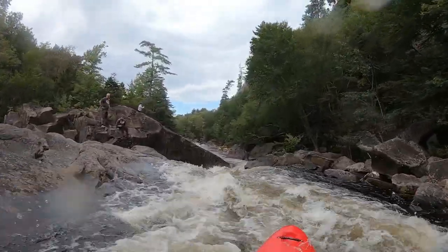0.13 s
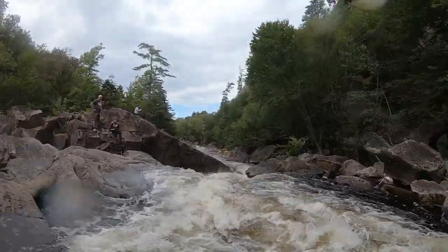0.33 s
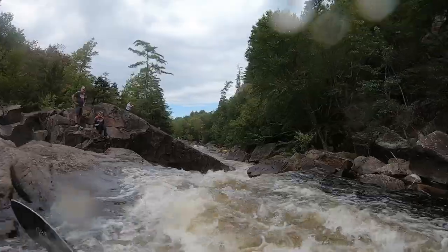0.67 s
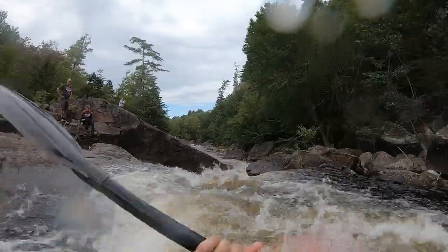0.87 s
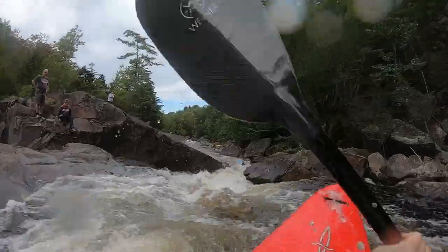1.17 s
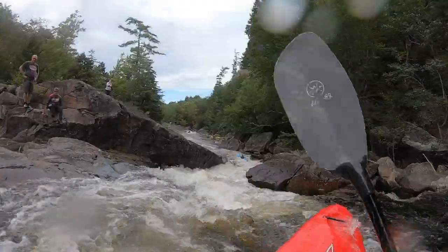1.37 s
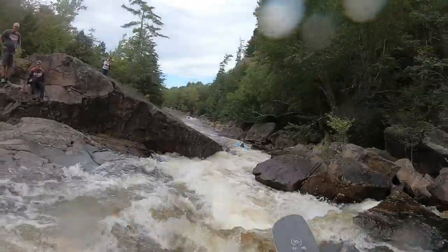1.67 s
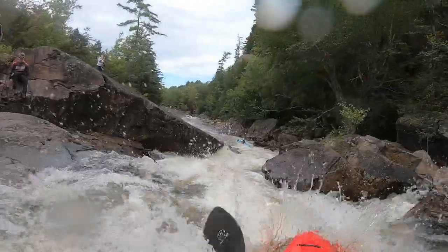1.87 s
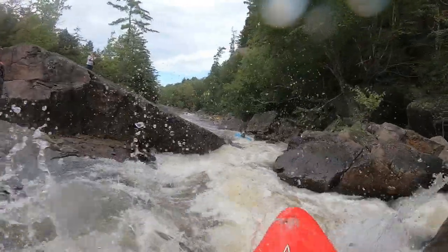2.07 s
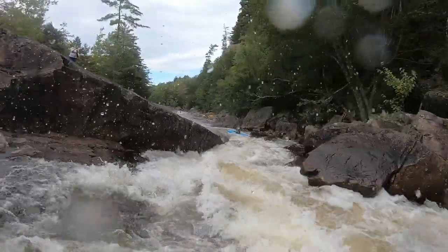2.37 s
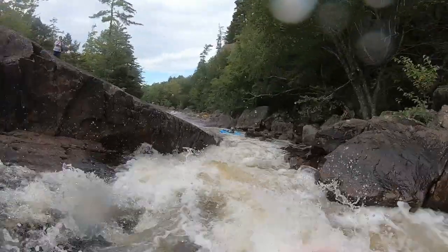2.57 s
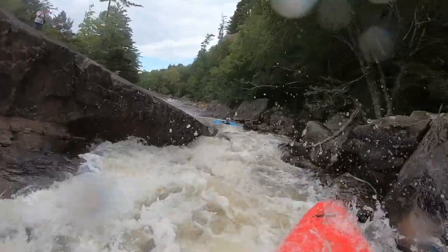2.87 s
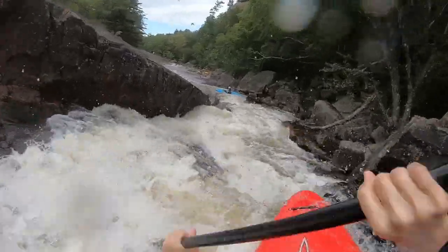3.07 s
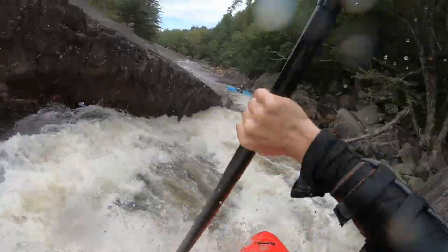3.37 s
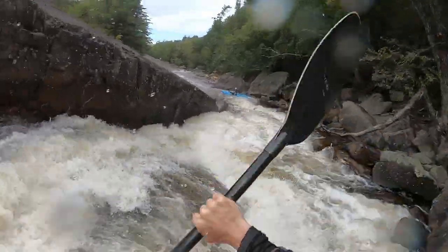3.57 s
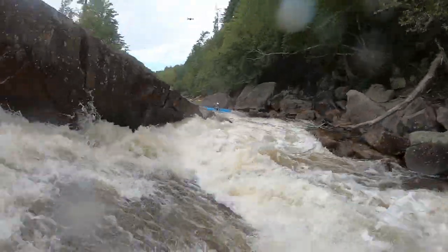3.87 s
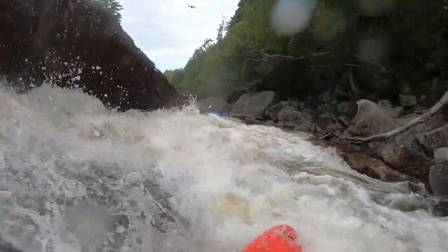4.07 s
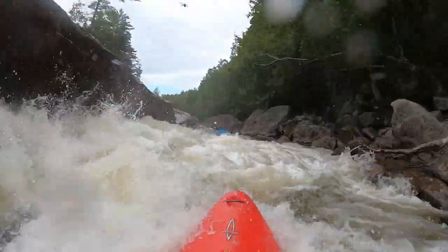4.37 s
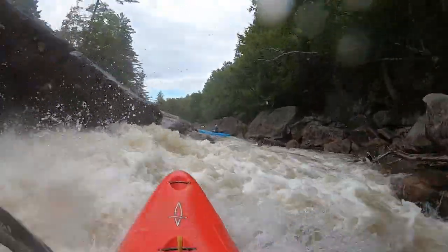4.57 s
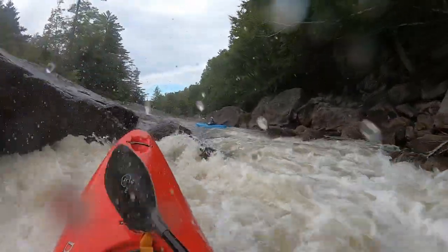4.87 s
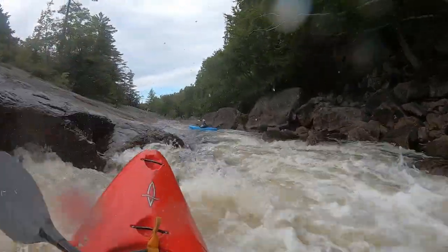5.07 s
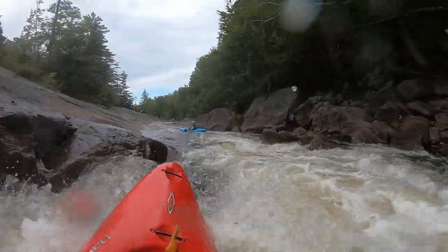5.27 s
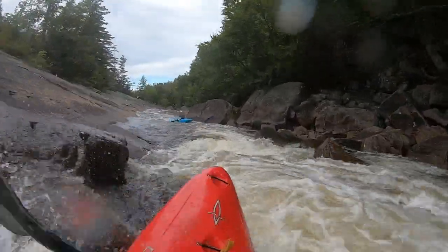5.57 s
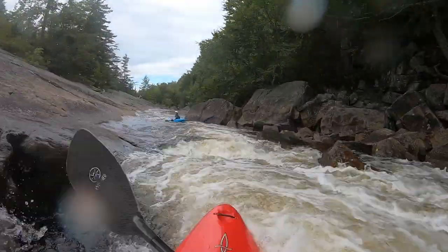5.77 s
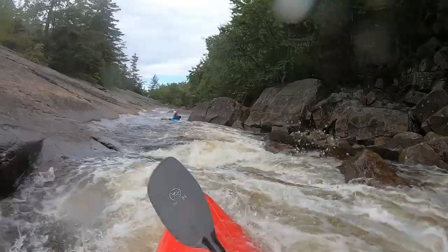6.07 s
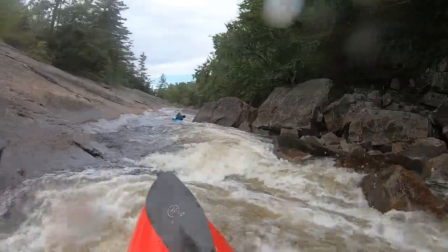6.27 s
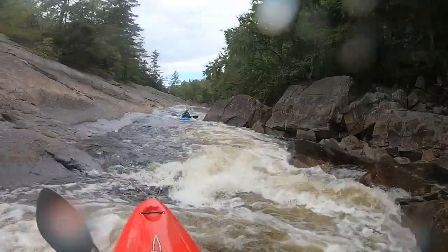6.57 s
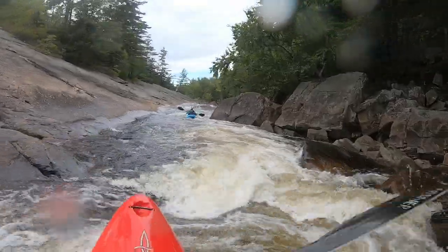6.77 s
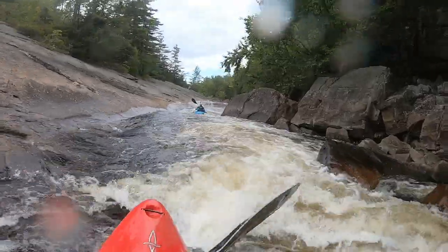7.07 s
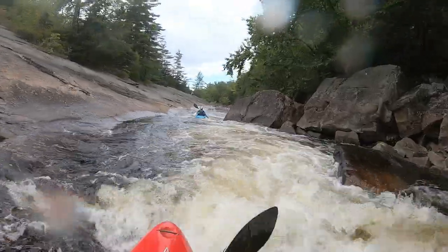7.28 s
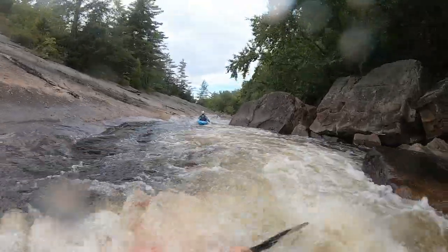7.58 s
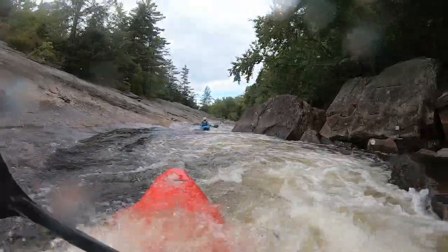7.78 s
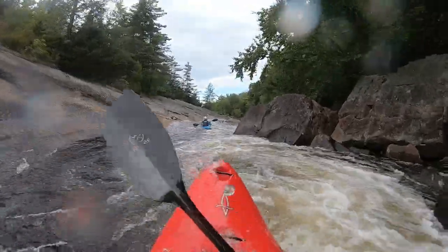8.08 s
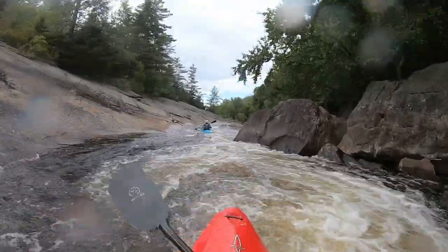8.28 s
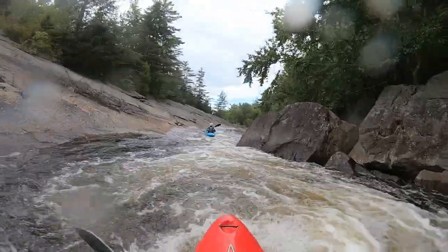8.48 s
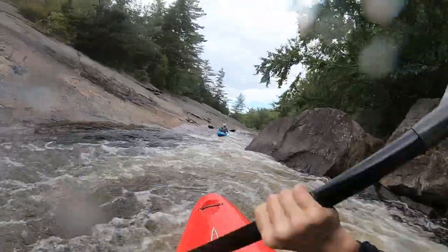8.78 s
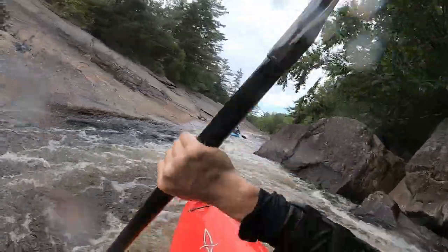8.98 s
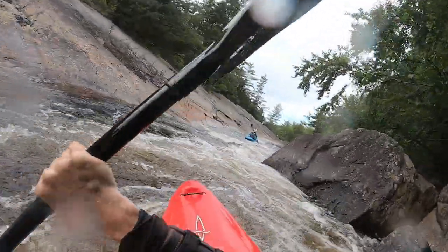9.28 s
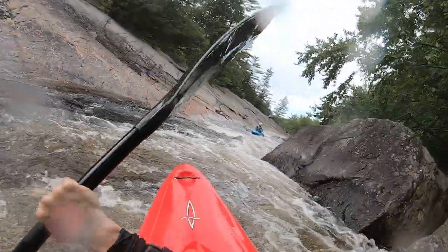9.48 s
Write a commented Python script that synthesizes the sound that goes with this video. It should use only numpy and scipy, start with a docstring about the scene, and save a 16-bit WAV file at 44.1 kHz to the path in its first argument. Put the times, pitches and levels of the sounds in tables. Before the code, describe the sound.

Close rushing river heard from a kayak's wet camera: muffled churning, heavy low knocks and surges, then a clearer, calmer rush with bubbling gurgles.

```python
"""A rocky whitewater rapid, run in a kayak, heard close by two microphones in a small camera's wet housing.
The river is hiss, ringing bubbles and pattering droplets, coloured by the housing and swelling with splashes.
Air and surges of water buffet the microphones as deep noise and slow swings; slaps thump in falling pitch.
Drops tick on the ringing case, spray spatters close by as bright noise, and clusters of bubbles gurgle.
A film of water muffles the microphone port until it bursts almost halfway down."""
import sys
import numpy as np
from scipy import signal
from scipy.fft import rfft, irfft
from scipy.io import wavfile
from scipy.ndimage import uniform_filter1d

SR = 44100
rng = np.random.default_rng(int(sys.argv[2]) if len(sys.argv) > 2 else 0)


def to_wav(s):
    """Save 16-bit WAV."""
    ch = np.atleast_2d(s).T  # columns
    pcm = np.round(np.clip(ch, -1, 1) * 32767)  # PCM
    wavfile.write(sys.argv[1], SR, pcm.astype(np.int16))


N = 424683
TIME = np.arange(N) / SR
CUTOFF_HZ = 15200

# how alike the two microphones hear:
# (frequency [Hz], share of power in common [0-1], lead of the left [rad])
MICROPHONE_PAIR = [(300, 1, -3), (491, 0.95, 1.12), (670, 0.7, -1.5), (820, 0.47, -3.5), (1030, 1, -4.5),
                   (1250, 0.88, -4), (1456, 0.68, -4.5), (1776, 0.86, -1.12), (2116, 0.24, 3.5),
                   (2270, 0.54, 2), (2560, 1, 2), (3100, 0.63, 5), (3550, 0.37, 5.5), (4200, 0.94, 3.5),
                   (5420, 0.14, 5), (6170, 0.68, 1.5), (7300.0, 0.17, 2.5), (8330, 0.6, 5),
                   (10140, 0.37, 6), (11600, 0, 27.5)]


def from_db(db):
    """Decibels to gain."""
    return 10 ** (np.asarray(db) / 20)


def to_db(gain):
    """Gain to decibels."""
    return 20 * np.log10(gain)


def rms_one(x):
    """Scale to an rms of 1."""
    return x / np.sqrt(np.mean(x ** 2) + 1e-20)


def in_time(rows, t):
    """The columns of a curve at the times t."""
    times, *columns = np.transpose(rows)
    return [np.interp(t, times, column) for column in columns]


def at_hz(rows, hz):
    """The columns of a spectrum at the frequencies hz, joined along a logarithmic axis."""
    points, *columns = np.transpose(rows)
    return [np.interp(np.log(hz + 1), np.log(points), column) for column in columns]


def drift(rate_hz):
    """Slow chance with a spread of 1: noise through two equal low-pass poles at rate_hz."""
    step = 40  # samples between drawn points
    pole = np.exp(-2 * np.pi * rate_hz * step / SR)
    noise = rng.standard_normal(N // step + 2002)
    slow = signal.lfilter([1], [1, -2 * pole, pole * pole], noise)[2000:]
    return np.interp(np.arange(N) / step, np.arange(len(slow)), rms_one(slow))


def ring(clicks, hz, t60):
    """A unit click sets a sine of height 1 ringing, down 60 dB after t60 seconds."""
    decay = np.exp(-np.log(1000) / (t60 * SR))
    angle = 2 * np.pi * hz / SR
    return signal.lfilter([0, np.sin(angle)], [1, -2 * decay * np.cos(angle), decay * decay], clicks + 1e-18)


def grains(per_s, spread_db):
    """Random clicks of either sign, many small and a few large."""
    sizes = from_db(spread_db * np.minimum(rng.exponential(1, N), 6))
    return (rng.random(N) < per_s / SR) * sizes * rng.choice([-1, 1], N)


def lumps(colour, lump_s=0.065):
    """Coloured noise of rms near 1, evened out so that no lump stands far above the next."""
    noise = rms_one(irfft(rfft(rng.standard_normal(N)) * colour, N))
    size = int(lump_s * SR)
    power = uniform_filter1d(uniform_filter1d(noise ** 2, size), size)
    return noise / np.sqrt(power + 0.015)


def foam(cycles=12.5, bubble_db=-11.02, droplet_db=-11.0, surge_db=0.87):
    """Countless far bubbles merge into hiss; near ones ring in clumps, and droplets patter."""
    births = grains(2600 * from_db(3 * drift(7)), spread_db=3.5)
    pitches = np.geomspace(250, 4500, 24)
    dealt = rng.integers(0, len(pitches), N)
    # each bubble falls 60 dB in the same number of cycles
    bubbles = sum(hz * ring(births * (dealt == k), hz, cycles / hz) for k, hz in enumerate(pitches))
    droplets = grains(700 * from_db(4 * drift(5)), spread_db=4.0)
    hiss = rng.standard_normal(N)
    mix = hiss + from_db(bubble_db) * rms_one(bubbles) + from_db(droplet_db) * rms_one(droplets)
    return mix * from_db(surge_db * drift(16.0))


def water_levels(t, trim_db=-0.6, swell_db=0.18, swell_hz=8, splash_fall_s=0.13):
    """Churn, roar and spray in dB: the swelling rapid, plus splashes that build to a crest and fall away."""
    # the steady rapid as the boat moves through it, before the trim:
    # (time [s], low churn [dB], mid roar [dB], high spray [dB])
    rapid = [(0.0, -39, -37.5, -56.5), (1.04, -38.5, -39, -57), (1.55, -41, -40.5, -58.5),
             (2.2, -37, -40.5, -58.5), (2.68, -42, -42, -59), (3.72, -34.5, -39, -56),
             (4.48, -42, -45.5, -61), (5.23, -41, -42.5, -58), (6.97, -41.5, -41.5, -58.5),
             (7.8, -35.5, -35.5, -52.5), (8.13, -40, -39, -57), (9.63, -46, -44.5, -62.5)]
    # waves and paddle strokes splashing beside the boat:
    # (crest time [s], build-up time constant [s], churn [dB], roar [dB], spray [dB])
    splashes = [(0.8, 0.16, -47, -43, -57.5), (1.11, 0.19, -41, -37.5, -55.5),
                (1.33, 0.11, -45, -39.5, -76), (1.72, .05, -50, -54, -56.5), (1.99, 0.1, -33.5, -61, -76),
                (2.26, 0.13, -32, -40, -55), (3.19, 0.044, -41, -52, -66), (3.8, 0.092, -39, -35.5, -55.5),
                (5.3, 0.17, -41, -46.5, -60.5), (5.72, 0.057, -39.5, -44.5, -72),
                (5.98, 0.087, -62, -44.5, -59), (6.72, 0.066, -38.5, -46, -66),
                (7.05, 0.089, -44, -46, -60), (7.38, 0.22, -41, -51, -56), (7.79, 0.084, -55, -39.5, -56),
                (7.95, 0.084, -32.5, -38, -61.5), (8.61, 0.23, -46, -44, -59.5),
                (9.17, 0.12, -40, -44, -60.5)]
    swell = swell_db * np.interp(t, TIME, drift(swell_hz))
    power = from_db(np.array(in_time(rapid, t)) + trim_db + swell) ** 2
    for crest_s, build_s, *zones_db in splashes:
        envelope = np.exp(-np.maximum((crest_s - t) / build_s, (t - crest_s) / splash_fall_s))
        power = power + np.outer(from_db(zones_db), envelope) ** 2
    return to_db(np.sqrt(power))


def humps(modes, hz):
    """Left and right gain in dB of broad resonances, on a grid of frequency by time."""
    total = 0
    for centre, width, left_db, right_db in modes:
        shape = np.exp(-(2 * (hz - centre) / width) ** 2)
        total = total + np.multiply.outer([left_db, right_db], shape)
    return total


def river(churn_hz=368.0, roar_hz=1250.0, spray_hz=5250.0, lowest_hz=100.0, bright_hz=7100.0,
          bright_gain=0.58, alike_below_hz=373.0):
    """Foam heard through the housing and the wet port; churn, roar and spray swell with each wave."""
    # colour of rushing water: (frequency [Hz], relative level [dB])
    water_colour = [(120, 0.5), (260, -11), (400, -8), (600, -13.5), (1100, -13), (2000, -19),
                    (3000, -18.5), (3700, -32.5), (7300, -39), (10000, -38.5), (11500, -46), (13500, -50.5),
                    (15000, -66)]
    # resonances of the housing: (frequency [Hz], width [Hz], left [dB], right [dB])
    housing = [(178.4, 58, 9, 10), (326, 114, 8, 6), (499.6, 56, 8.5, 3), (733, 117, 7, 8.5),
               (1010, 270, 6, 8.5), (1325, 322, 13.5, 15), (1749, 420, 14.5, 11), (2310, 127, 3, -5),
               (3270, 450, 4, 2.5), (4157, 214, 10, 6.5), (4780, 850, 4.5, 1), (5887, 930, 11, 11),
               (6830, 850, 10, -1), (7970, 1000, 2.5, 6), (9730, 2200, 2.5, 2)]
    # resonances of the port when clear of water: (frequency [Hz], width [Hz], left [dB], right [dB])
    open_port = [(2324, 340, 12.5, 8.5), (2679, 530, 14.5, 8.5), (5970, 380, 7, 3), (9700, 1000, 3, 0)]
    # the film weighs the port down and damps it: (time [s], openness [0-1], tuning [ratio])
    film = [(0, 0.13, 0.94), (3.5, 0.08, 1), (4.05, 0.1, 0.61), (4.2, 0.1, 0.67), (4.35, 0.2, 0.51),
            (4.39, 0.6, 0.87), (4.44, 0.93, 0.96), (5.1, 1, 0.96), (9.63, 1, 0.98)]
    # where churn, roar and spray lie: (low edge [Hz], high edge [Hz])
    zones = [(130, 700), (900, 1900), (4000, 12000)]

    frame = 1024  # samples
    hz, t, (shared, *own) = signal.stft([foam(), foam(), foam()], SR, nperseg=frame)
    grid = hz[:, None]

    # long waves reach both microphones alike
    alike, lead = at_hz(MICROPHONE_PAIR, grid)
    alike = np.where(grid < alike_below_hz, 1, np.clip(alike, 0, 1))
    lead = lead * (grid > alike_below_hz)
    sound = np.sqrt(alike) * shared + np.sqrt(1 - alike) * np.array(own)
    sound[0] *= np.exp(1j * lead)

    openness, tuning = in_time(film, t)
    levels_db = water_levels(t)
    colour_db = at_hz(water_colour, grid)[0] + humps(housing, grid)
    colour_db = colour_db + openness * humps(open_port, grid / tuning)
    # the louder the spray, the brighter its top
    louder_db = levels_db[2] - levels_db[2].mean()
    colour_db = colour_db + bright_gain * louder_db * np.clip(np.log2((grid + 1) / bright_hz), 0, 1)
    sound *= from_db(colour_db) * np.minimum(grid / lowest_hz, 1) ** 2

    # each zone of the spectrum follows its own level, blending into the next
    power = np.mean(np.abs(sound.mean(axis=0)) ** 2, axis=1) * 4 / 3  # 4/3 for the Hann window
    shares = at_hz(np.c_[[churn_hz, roar_hz, spray_hz], np.eye(len(zones))], grid)
    for (low, high), share, level_db in zip(zones, shares, levels_db):
        zone_rms = np.sqrt(power[(hz >= low) & (hz < high)].sum())
        sound *= (from_db(level_db) / zone_rms) ** share
    return signal.istft(sound, SR, nperseg=frame)[1][:, :N]


def air_level(trim_db=2.5, unrest_db=1.5, unrest_hz=8.9, attack_s=0.0166, release_s=0.0185):
    """Pressure on the microphone in dB: restless airflow, plus gusts that rise, hold and let go."""
    # steady push of the air on the microphone, before the trim: (time [s], level [dB])
    airflow = [(0.0, -39), (0.62, -35), (1.6, -34), (2.15, -28.5), (2.68, -37), (3.0, -29), (3.7, -27),
               (4.2, -28.5), (4.33, -36.5), (4.72, -35.5), (5.71, -34.5), (6.25, -42.5), (8.07, -33),
               (8.39, -38), (9.09, -40), (9.63, -41.5)]
    # gusts as the boat lurches: (time of full strength [s], hold [s], level [dB])
    gusts = [(0.277, 0.063, -30.5), (0.846, 0.12, -29), (1.115, 0.15, -25.5), (1.966, 0.08, -26.5),
             (2.198, 0.078, -28.5), (2.986, 0.047, -21), (3.132, 0.095, -23), (3.763, 0.051, -18),
             (4.094, 0.069, -21.5), (4.536, 0.05, -29.5), (4.761, 0.029, -27.5), (4.953, 0.057, -27),
             (5.116, 0.065, -31), (5.433, 0.39, -32), (6.085, 0.11, -29.5), (6.77, 0.44, -31.5),
             (7.525, 0.16, -31.5), (7.916, 0.24, -30.5), (9.133, 0.13, -32.5)]
    steady_db = in_time(airflow, TIME)[0] + trim_db
    power = from_db(steady_db + unrest_db * drift(unrest_hz)) ** 2
    for start_s, hold_s, db in gusts:
        end_s = start_s + hold_s
        corners = [start_s - attack_s, start_s, end_s, end_s + release_s]
        envelope = np.interp(TIME, corners, [0, 1, 1, 0])
        power = power + (from_db(db) * envelope) ** 2
    return to_db(np.sqrt(power))


def buffeting(hard_edge_hz=87.6, hard_from_db=-32.0, hard_range_db=11.5):
    """Lumps of pressure on the microphone: gentle gusts are deep and slow, hard ones flutter faster."""
    # colour of the gentle buffeting: (frequency [Hz], relative level [dB])
    buffet_colour = [(5, -43), (15, 9.5), (27, -3.5), (50, -4.5), (70, -7), (100, -17.5), (130, -20),
                     (200, -50), (300, -130)]
    hz = np.arange(N // 2 + 1) * SR / N
    gust_db = air_level()
    gentle = lumps(from_db(at_hz(buffet_colour, hz)[0]))
    hard = lumps(np.minimum(hz / 20, 1) / (1 + (hz / hard_edge_hz) ** 12))
    share = np.clip((gust_db - hard_from_db) / hard_range_db, 0, 1)
    return (np.sqrt(1 - share) * gentle + np.sqrt(share) * hard) * from_db(gust_db)


def slaps(glide_s=0.0055, rise_s=0.0038, rise_share=0.33, splash_db=-12.5, splash_hz=780.0,
          splash_s=0.0047):
    """Water piles on the port, so its ring falls in pitch, with a short dull splash; short slaps hit sharply."""
    # slaps and plops on the microphone, level before the rise and decay:
    # (time [s], level [dB], start pitch [Hz], end pitch [Hz], decay [s])
    slap_list = [(0.766, -31, 523, 443, 0.008), (1.083, -33, 260, 160, 0.0077),
                 (1.717, -25, 730, 440, 0.013), (1.723, -29, 220, 110, 0.0069),
                 (1.736, -29, 450, 280, .006), (1.935, -29.5, 520, 150, 0.029),
                 (2.216, -27.5, 258, 188, 0.028), (2.261, -27, 420, 110, 0.015),
                 (2.3395, -18.5, 560, 150, 0.0032), (3.187, -30, 330, 152, 0.0088),
                 (3.7425, -13.5, 824, 55, 0.01), (3.765, -22, 800, 70, 0.0047),
                 (3.775, -14.5, 162, 82, 0.012), (3.791, -14, 530, 90, 0.0045),
                 (3.798, -20.5, 776, 150, 0.0032), (3.7993, -23, 1080, 990, 0.0054),
                 (3.803, -8, 118, 69, 0.019), (3.823, -29, 900, 820, .005), (3.993, -15, 624, 42, 0.01),
                 (4.105, -26, 300, 110, 0.012), (4.131, -29, 300, 120, 0.014),
                 (4.769, -22.5, 150, 70, 0.0098), (4.945, -24, 423, 115, 0.02),
                 (4.975, -16.5, 300, 168, 0.0091), (5.079, -30, 260, 170, 0.01),
                 (5.484, -25, 258, 155, 0.019), (5.724, -31, 420, 280, 0.0065),
                 (6.545, -31.5, 248, 167, 0.014), (7.036, -33, 262, 172, 0.009),
                 (7.903, -27, 240, 190, .014), (7.921, -19, 232, 65.5, 0.029), (7.97, -32, 332, 224, 0.015),
                 (7.995, -28, 260, 175, .012), (8.669, -28.5, 248, 172, 0.013)]
    out, t = np.zeros(N), TIME[:SR // 2]
    dull = signal.butter(4, splash_hz, fs=SR, output="sos")
    for s, db, start_hz, end_hz, decay_s in slap_list:
        pitch = end_hz + (start_hz - end_hz) * np.exp(-t / glide_s)
        thump = np.sin(2 * np.pi * np.cumsum(pitch) / SR) * np.exp(-(t / decay_s) ** 2 / 2)
        splash = rms_one(signal.sosfilt(dull, rng.standard_normal(len(t)))) * np.exp(-t / splash_s)
        rise = 1 - np.exp(-(t / min(rise_s, rise_share * decay_s)) ** 2)
        at = round(s * SR)
        out[at:at + len(t)] += from_db(db) * rise * (thump + from_db(splash_db) * splash)
    return out


def thumps(trim_db=-1.5, spread_cycles=0.55):
    """Each surge of water shoves the microphone in one slow swing of pressure that swells and ebbs."""
    # surges, level before the trim and the bell-shaped envelope:
    # (centre time [s], level [dB], pitch [Hz])
    surges = [(1.132, -19, 40), (1.186, -15, 45), (1.769, -11, 28), (1.906, -16, 19.5), (1.968, -20, 44),
              (2.009, -15, 32), (2.101, -19, 32), (2.163, -19.5, 21), (2.271, -20, 34), (2.34, -5.5, 34),
              (2.415, -14.5, 29), (2.767, -19, 30), (2.872, -22, 35), (2.909, -12, 28), (2.959, -16, 28),
              (3.171, -17, 69), (3.539, -14.5, 53), (3.59, -9, 50), (3.643, -17, 30), (3.761, -12, 75),
              (3.872, -23, 45), (3.905, -9.5, 28), (4.001, -8, 46), (4.089, -13, 46), (4.143, -8.5, 38),
              (4.225, -14, 40), (4.277, -10.5, 32), (5.158, -24, 40), (5.484, -23, 24), (5.663, -18, 29),
              (5.772, -23, 32), (6.62, -21.5, 31), (8.026, -19.5, 38)]
    out, t = np.zeros(N), TIME[:SR // 4] - 1 / 8
    for s, db, hz in surges:
        envelope = np.exp(-(hz * t / spread_cycles) ** 2 / 2)
        at = round((s + t[0]) * SR)
        out[at:at + len(t)] += from_db(db + trim_db) * np.sin(2 * np.pi * hz * t) * envelope
    return out


def ticks(soft_hz=3200.0, lowest_hz=300.0, crack_hz=1500.0):
    """A drop cracks and its brief spatter rings those case modes near its pitch, out of step at the two ports."""
    # drops and knocks on the case: (time [s], level over 5 ms [dB], favoured pitch [Hz],
    # spread [octaves], contact [s], left over right [dB], crack over ring [dB])
    knocks = [(1.7195, -25, 875, 0.39, 0.0016, 5, -10.5), (2.3414, -14, 1570, 0.145, 0.00016, 6.5, -11.5),
              (3.689, -28, 1050, 0.54, .001, 7, -17), (3.7442, -29, 1300, .25, 0.00092, 1, -15),
              (3.7915, -24, 1140, 0.3, 0.0011, 2, -17), (3.867, -34, 1550, .3, 0.00074, 3, -10),
              (4.377, -30, 1840, 0.22, 0.00061, 5, -14), (4.7923, -23.5, 2090, 0.18, 0.00058, 7, -20),
              (4.826, -34, 2270, 0.18, 0.00086, 7, -10), (4.901, -28.5, 1130, 0.33, 0.00082, 6.5, -8),
              (4.9005, -37, 3100, .1, 0.00064, 3, -25), (4.9265, -27, 2700, 1.7, 0.00045, -1, -10),
              (4.974, -25, 1180, 0.11, 0.00081, -1, -14), (6.412, -34, 3000, 0.53, .0007, 10, -12),
              (8.608, -25, 1750, 0.36, 0.0027, 6, -20), (8.639, -29.5, 2500, .3, .003, 8, -16)]
    # what the case rings with: (frequency [Hz], relative level [dB], t60 [s])
    case_modes = [(480, 8, 0.024), (760, 1, .014), (1050, -4, .014), (1300, 1.5, 0.012), (1570, 3, 0.0062),
                  (1773, 0.5, 0.029), (2270, -1.5, 0.029), (2830, -3, 0.012), (3100, -5, 0.012)]
    out, t = np.zeros((2, N)), TIME[:SR // 10]
    soft = signal.butter(12, soft_hz, fs=SR, output="sos")
    crack_band = signal.butter(1, [lowest_hz, crack_hz], "band", fs=SR, output="sos")
    sharp = np.vstack([soft, crack_band])
    for s, db, favoured_hz, spread, contact_s, pan_db, crack_db in knocks:
        reach_hz = np.clip(favoured_hz * 2 ** (2 * spread * np.array([-1, 1])), lowest_hz, SR / 4)
        wet = np.vstack([soft, signal.butter(2, reach_hz, "band", fs=SR, output="sos")])
        spatter = rng.standard_normal(len(t)) * t * np.exp(-t / contact_s) / contact_s
        contact = signal.sosfilt(wet, spatter)
        ringing = 0
        for hz, mode_db, t60 in case_modes:
            pole = np.exp((2j * np.pi * hz - np.log(1000) / t60) / SR)
            phases = [np.exp(1j * at_hz(MICROPHONE_PAIR, hz)[1]), 1]
            at_ports = np.outer(phases, signal.lfilter([1], [1, -pole], contact)).real
            weight = np.exp(-(np.log2(hz / favoured_hz) / spread) ** 2 / 2)
            ringing = ringing + from_db(mode_db) * weight * rms_one(at_ports)
        # the crack comes where the spatter is thickest
        crack = signal.sosfilt(sharp, signal.unit_impulse(len(t), int(contact_s * SR)) + 1e-18)
        hit = rms_one(rms_one(ringing) + from_db(crack_db) * rms_one(crack))
        hit = hit * np.sqrt(0.005 * SR / len(t))  # the energy of an rms of 1 held for 5 ms
        at = round(s * SR)
        out[:, at:at + len(t)] += from_db(db + np.array([[pan_db], [-pan_db]]) / 2) * hit
    return out


def drops(trim_db=-1.0, fade_s=0.0018, width=1.4):
    """Each drop of spray bursts by the microphone in a tiny bright spatter of band-passed noise."""
    # single drops, level before the trim: (time [s], peak level [dB], pitch [Hz])
    drop_list = [(2.258, -39, 6000), (2.3265, -31, 5560), (2.342, -39, 4200), (4.9014, -36, 6000),
                 (4.9273, -38.5, 5000), (5.863, -44, 11000), (6.413, -46, 6500), (8.494, -48, 6500)]
    out, t = np.zeros((2, N)), TIME[:SR // 50]
    for s, db, hz in drop_list:
        edges_hz = [hz / width, min(hz * width, CUTOFF_HZ)]
        band = signal.butter(2, edges_hz, "band", fs=SR, output="sos")
        burst = signal.sosfilt(band, rng.standard_normal((2, len(t))) * np.exp(-t / fade_s))
        at = round(s * SR)
        out[:, at:at + len(t)] += from_db(db + trim_db) * burst / np.abs(burst).max()
    return out


def gurgles(per_s=530.0, cycles=19.7, scatter_octaves=0.37, trim_db=-7.0):
    """A cluster of close bubbles, each ringing briefly at a pitch of its own."""
    # water gurgling over the housing, level of a bubble before the trim:
    # (centre time [s], level [dB], pitch [Hz], length [s])
    clusters = [(2.268, -33, 497, 0.026), (3.679, -28.5, 775, 0.018), (3.784, -28, 1000, 0.011),
                (3.835, -30, 900, .025), (4.195, -26, 1590, 0.014), (4.222, -26, 1660, 0.012),
                (4.267, -27, 1690, 0.013), (4.308, -31, 1760, 0.017), (7.452, -32.5, 520, 0.074),
                (7.6, -32, 1250, .05), (7.69, -31.5, 450, 0.051), (7.72, -30.5, 1070, .06),
                (7.795, -31, 2350, .025), (7.85, -25, 1210, 0.047), (7.886, -28.5, 410, 0.02),
                (7.942, -28, 425, 0.024), (7.96, -25.5, 1170, 0.025), (7.986, -31, 300, 0.024),
                (7.994, -26, 910, 0.011), (8.034, -27.5, 1080, 0.03)]
    out, t = np.zeros(N), TIME[:SR // 10]
    for s, db, pitch_hz, length_s in clusters:
        count = int(2 * length_s * per_s)  # 64 at most
        scatter = scatter_octaves * min(1, (800 / pitch_hz) ** 3)  # high clusters scatter less
        for offset, detune, size in rng.standard_normal((64, 3))[:count]:
            hz = pitch_hz * 2 ** (scatter * detune)
            at = round((s + length_s * offset / 2) * SR)
            bubble = ring(t == 0, hz, cycles / hz) * (1 - np.exp(-2 * hz * t))
            out[at:at + len(t)] += from_db(db + trim_db + 2 * size) * bubble
    return out


def scene(lean_db=1.0):
    """The river all round; pressure, slaps and gurgles lean right: left down, right up by lean_db."""
    around = river() + ticks() + drops()
    close = buffeting() + thumps() + slaps() + gurgles()
    return around + close * from_db([[-lean_db], [lean_db]])


def record(dry):
    """An elliptic low-pass cuts the top steeply."""
    return signal.sosfilt(signal.ellip(10, .1, 80, CUTOFF_HZ, fs=SR, output="sos"), dry)


dry = scene()
out = record(dry)
to_wav(out)
```